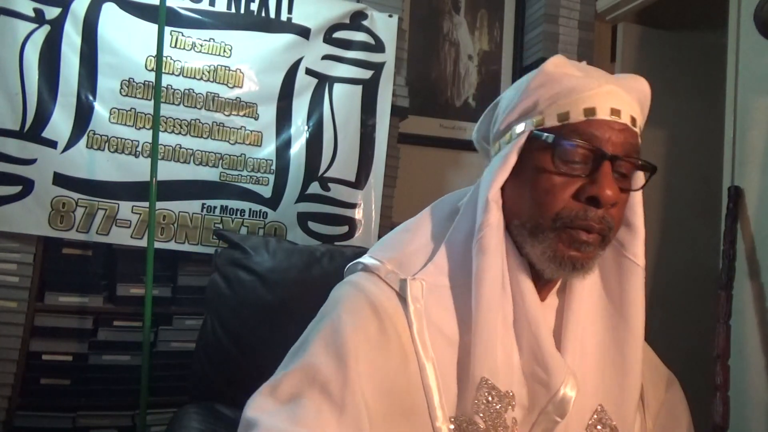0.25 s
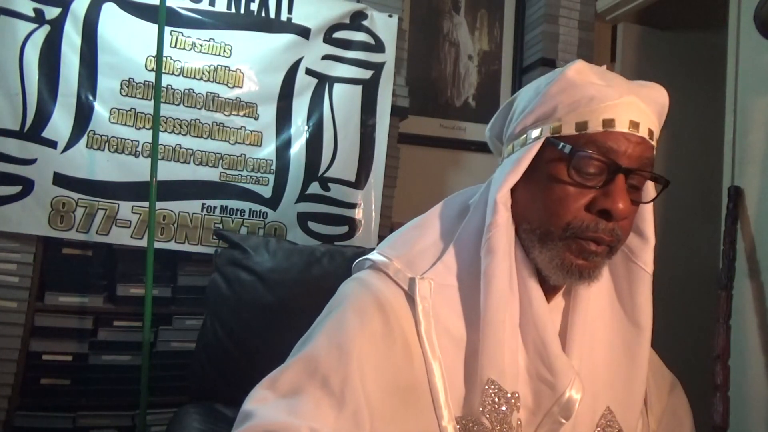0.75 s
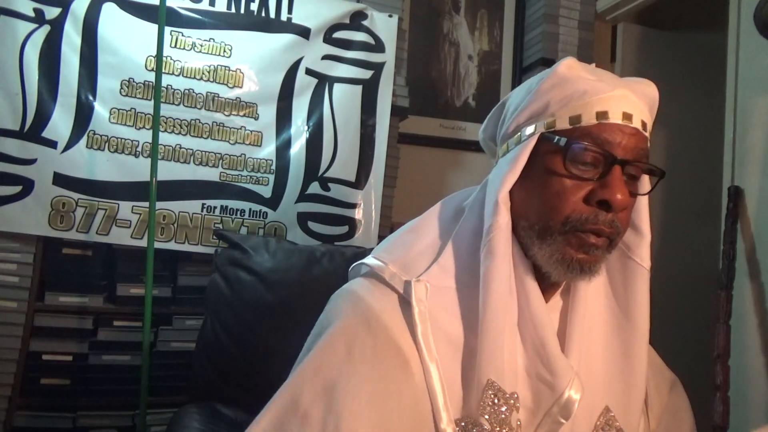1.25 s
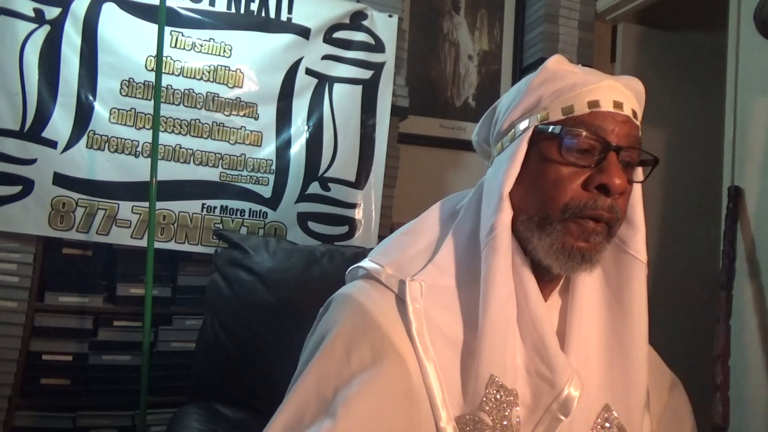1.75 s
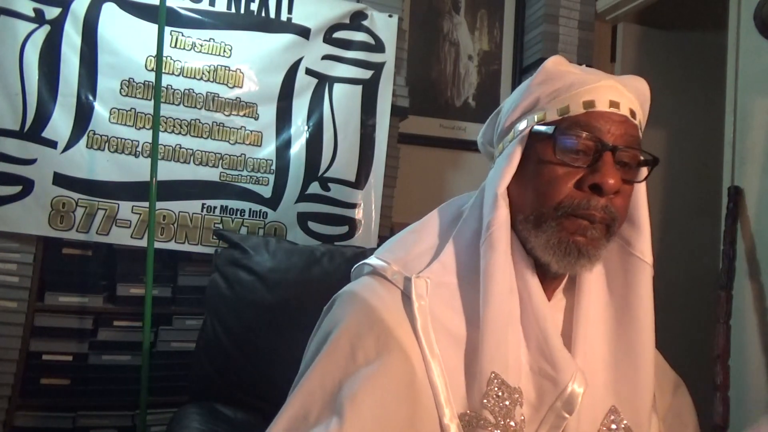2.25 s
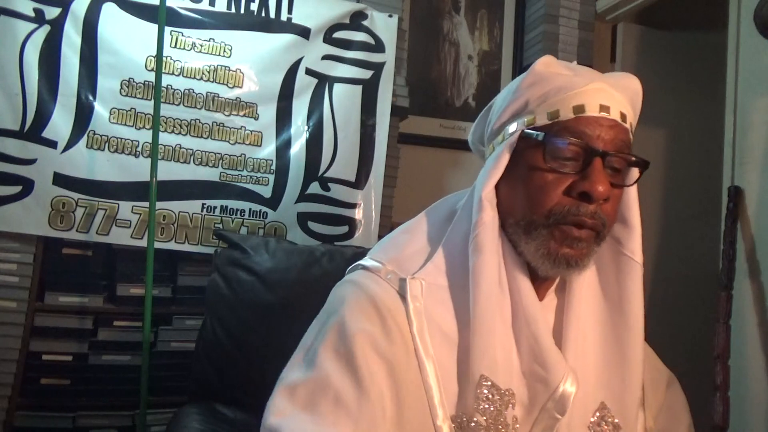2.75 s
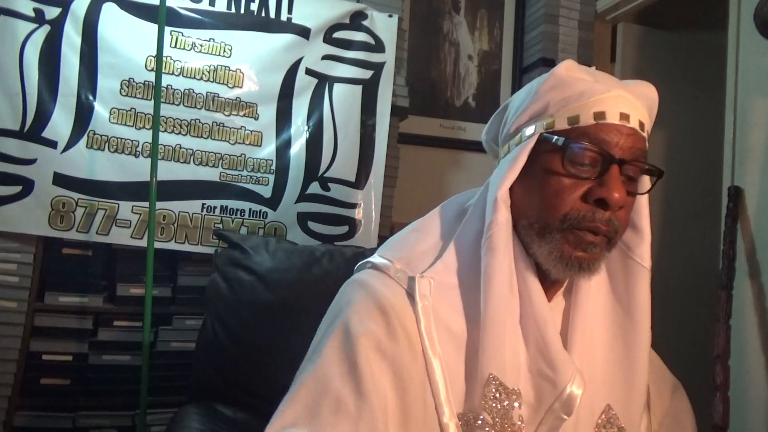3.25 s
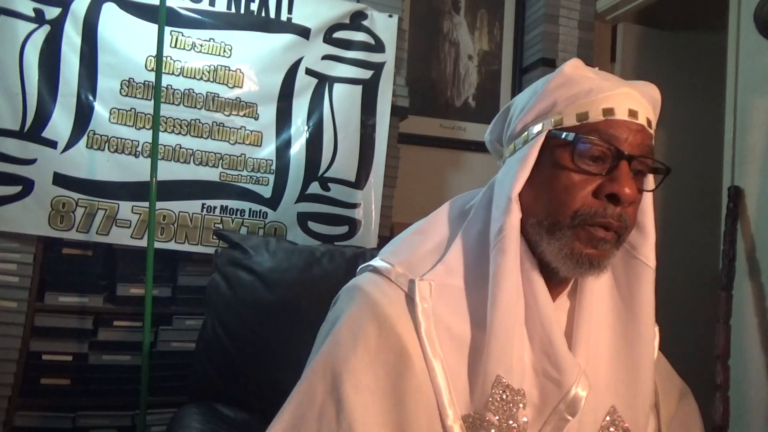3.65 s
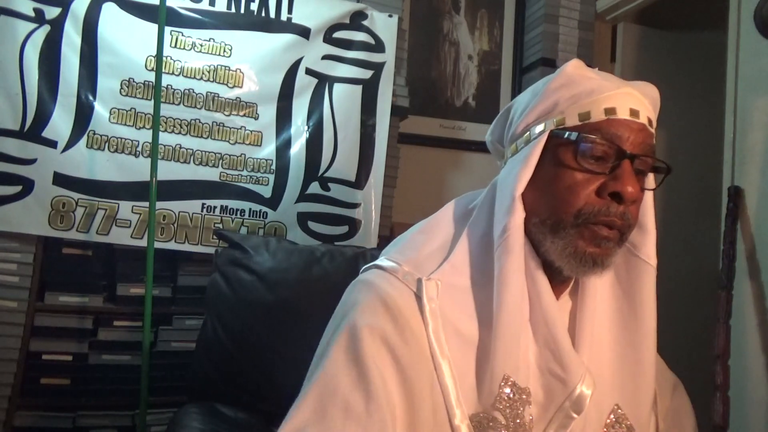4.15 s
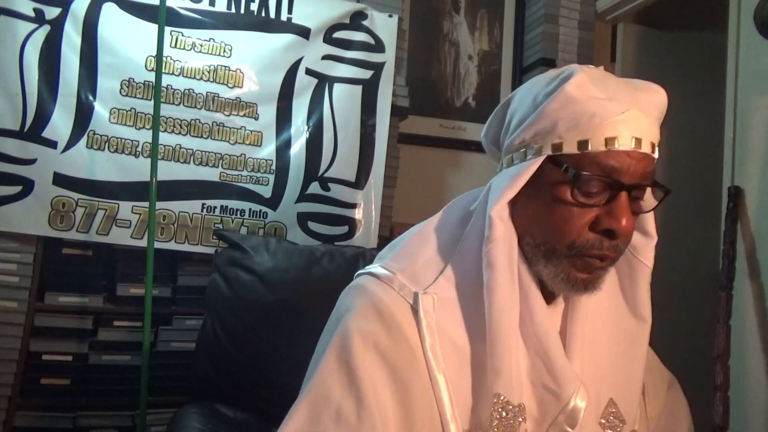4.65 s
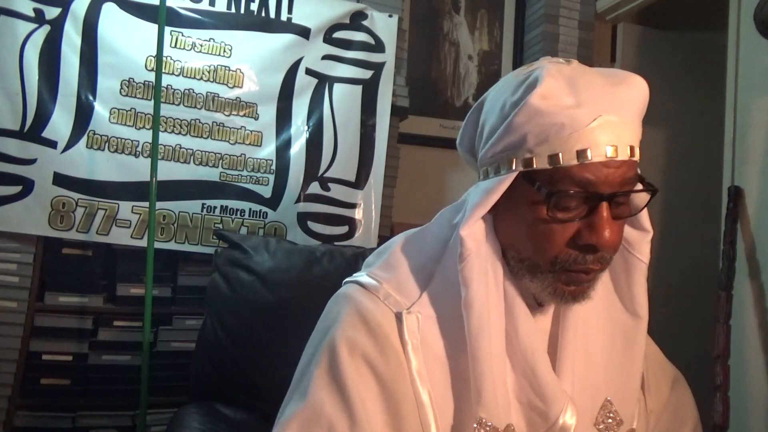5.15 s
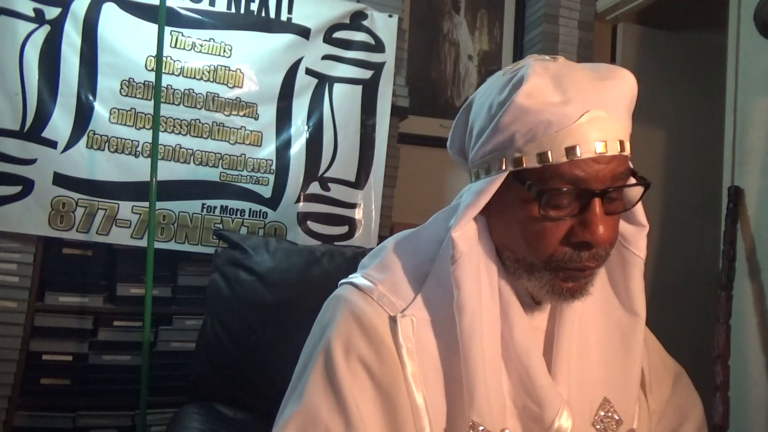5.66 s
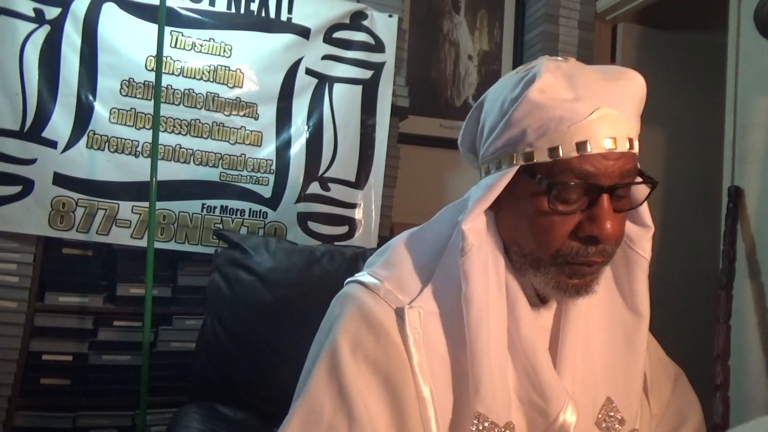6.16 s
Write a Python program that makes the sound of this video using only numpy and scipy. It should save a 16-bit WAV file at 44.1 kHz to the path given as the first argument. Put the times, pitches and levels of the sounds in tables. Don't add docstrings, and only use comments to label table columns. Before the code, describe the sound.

Close paper pages slide, crinkle and snap in irregular bursts, loudest around the middle, over a quiet room with faint fan hum and camera ticking.

```python
import sys
import numpy as np
from scipy import signal
from scipy.io import wavfile
from scipy.ndimage import uniform_filter1d

SR = 44100
rng = np.random.default_rng(int(sys.argv[2]) if len(sys.argv) > 2 else 0)


def pcm_store(signal):
    levels = np.round(np.clip(np.atleast_2d(signal), -1, 1) * 32767)
    wavfile.write(sys.argv[1], SR, levels.astype(np.int16).T)


def field_ratio(decibels):
    return 10 ** (np.asarray(decibels, dtype=float) / 20)


N = 282681


def rms_one(x):
    return x / np.sqrt(np.mean(x ** 2) + 1e-20)


def peak_one(x):
    return x / np.sqrt(uniform_filter1d(x ** 2, size=44).max() + 1e-20)


def at_hz(points, hz):
    table_hz, values = np.transpose(points)
    return np.interp(np.log(hz), np.log(table_hz), values)


def band(x, lo_hz, hi_hz):
    sos = signal.butter(2, [lo_hz, min(hi_hz, 0.45 * SR)], "band", fs=SR, output="sos")
    return signal.sosfilt(sos, x)


def resonance(x, hz, width_hz):
    r = np.exp(-np.pi * width_hz / SR)
    top = np.array([1, 0, -1]) * (1 - r * r) / 2
    return signal.lfilter(top, [1, -2 * r * np.cos(2 * np.pi * hz / SR), r * r], x)


def ring_twice(x, hz, width_hz):
    return resonance(resonance(x, hz, width_hz), hz, width_hz)


def drift(rate_hz):
    r = np.exp(-80 * np.pi * rate_hz / SR)
    chance = rng.standard_normal(N // 40 + 2002)
    slow = signal.lfilter([1], [1, -2 * r, r * r], chance)[2000:]
    return np.interp(np.arange(N) / 40, np.arange(len(slow)), rms_one(slow))


# centre in Hz, width in Hz, level in dB.
FAN_TONES = [(184, 31, -76.5), (709, 81, -76.5), (1008, 8.2, -73), (1850, 26, -86)]


def fan(white):
    return sum(field_ratio(db) * rms_one(resonance(white, hz, width_hz)) for hz, width_hz, db in FAN_TONES)


# frequency in Hz, level in dB per Hz.
HUSH_COLOUR = [(25, -7.5), (70, -7), (110, -5), (190, -7.5), (450, -13), (1000, -13), (2400, -19.5),
               (5000, -24), (10000, -29.5), (16000, -31.5)]
# frequency in Hz, left-right likeness from 0 to 1.
HUSH_LIKENESS = [(60, 0.99), (150, 0.96), (380, 0.44), (950, 0.066), (2380, 0.32), (5980, 0.8),
                 (15000, 0.99)]


def hush():
    level_db = -58.5
    edges_hz = 22 * 2 ** np.arange(0, 10, 0.5)
    white = rng.standard_normal((2, 2, N))
    air = 0
    for k, (low_hz, high_hz) in enumerate(zip(edges_hz, edges_hz[1:])):
        mid, side = band(white[k % 2], low_hz, high_hz)
        hz = np.sqrt(low_hz * high_hz)
        alike = np.clip(at_hz(HUSH_LIKENESS, hz), 0, 1)
        stereo = np.sqrt(1 + alike) * mid + np.sqrt(1 - alike) * side * [[1], [-1]]
        air = air + field_ratio(at_hz(HUSH_COLOUR, hz)) * stereo
    return field_ratio(level_db) * rms_one(air) + fan(white[0, 0])


def seat():
    hz, width_hz, level_db = 179, 68, -64
    until_s, fade_s = 0.55, 0.25
    t = np.arange(N) / SR
    rumble = rms_one(ring_twice(rng.standard_normal(N), hz, width_hz))
    return field_ratio(level_db - 20 * np.maximum(t - until_s, 0) / fade_s) * rumble


# start in seconds, hold in seconds, level in dB,
# stiffness as tilt of the body in dB, edge hiss in dB relative to the level.
PAGE_DRAGS = [(0, .02, -60, -5, -10), (.22, 0.16, -66, 1, -6.5), (1.04, 0.15, -47, -3, -9.5),
              (1.21, .14, -51.5, 1, -5.5), (1.42, .24, -54, 0.5, -4.5), (1.71, 0.12, -60, -3, -3.5),
              (1.975, 0.035, -51.5, 3, 0), (2.08, 0.11, -46.5, 8, -11), (2.32, 0.031, -45.5, 9, -6),
              (2.46, 0.14, -66.5, 6, -1), (2.7, 0.16, -53, 0, -6.5), (2.9, 0.094, -47, 0, -7.5),
              (3.12, 0.045, -45.5, 16, -10), (3.26, 0.2, -41.5, -5, -13), (3.62, 0.14, -64.5, -7, -4),
              (3.97, 0.24, -50, 2, -5), (4.2, 0.3, -50, 3, -4.5), (4.68, 0.067, -52.5, -1, -7.5),
              (4.97, 0.18, -55, -3, -8.5), (5.22, 0.21, -54.5, 3, -8.5), (5.57, 0.091, -54.5, 7, -5.5),
              (5.75, 0.31, -55, 0, -8.5), (6.15, 0.11, -55, 4, -6), (6.29, .12, -52.5, 1, -6.5)]
# peak in seconds, level in dB, stiffness in dB, edge hiss in relative dB.
HAND_TUGS = [(.18, -55.5, -3, -5), (.528, -59.5, -6, -5), (0.718, -57, 14, -6.5), (1.155, -50, -12, -20),
             (1.6, -61, 10, 7), (2.053, -47, 25, -2.5), (2.2, -45, 10, -2.5), (2.228, -51, 13, -5),
             (2.294, -42, 4, -4), (2.741, -45, -2, -3), (3.01, -49.5, 5, -7), (3.205, -33.5, 12, -8),
             (3.315, -36.5, 7, -2.5), (3.464, -29.5, 9, -8), (3.531, -41, -17, -20),
             (3.908, -36, 4.5, -2.3), (4.228, -49, 2.5, -8), (4.357, -47.5, -2, -9), (4.43, -39.5, 3, -11),
             (4.485, -49.5, 7, -11), (4.559, -48, 6, -4), (4.774, -41.5, -3, -6), (4.925, -44.5, 6, -6),
             (5.158, -47.5, -3, -14), (5.185, -52, 4, -2), (5.552, -49, 3.5, -4), (5.975, -39, 8.5, -9),
             (6.408, -45, -7, -5)]


def pulls():
    rise_db_per_s, fall_db_per_s, rest_db = 267, 225, -76
    flap_db, flap_follows = -57.5, 0.8
    flap_stiff = 0.2
    rows = PAGE_DRAGS + [(s, 0, db, stiff, skim) for s, db, stiff, skim in HAND_TUGS]
    start, hold, db, stiff, skim = np.transpose(rows)[:, :, None]
    t = np.arange(0, N + 64, 64) / SR
    rise = rise_db_per_s * np.maximum(start - t, 0)
    fall = fall_db_per_s * np.maximum(t - start - hold, 0)
    pull_db = db - rise - fall
    power, rest = field_ratio(2 * pull_db), field_ratio(2 * rest_db)
    body = power.sum(axis=0) + rest
    flap = field_ratio(2 * (flap_db + flap_follows * (pull_db + 50) - flap_stiff * stiff)).sum(axis=0)
    edge = (power * field_ratio(2 * skim)).sum(axis=0) + rest * field_ratio(-10)
    tilt_db = (power * stiff).sum(axis=0) / body
    return t, 10 * np.log10(body), 10 * np.log10(flap), 10 * np.log10(edge), tilt_db


def crackle(per_s, spread_db, clump_db):
    sizes = field_ratio(spread_db * np.minimum(rng.exponential(1, N), 5)) * rng.choice([-1, 1], N)
    born = rng.random(N) < per_s / SR
    return rms_one(sizes * born * field_ratio(clump_db * drift(26.0)))


def slide():
    s, *levels = pulls()
    felt = np.arange(N) / SR - 0.006
    body_db, flap_db, edge_db, tilt_db = (np.interp(felt, s, level) for level in levels)
    grains = crackle(5000, spread_db=2.5, clump_db=2.0)
    dealt = rng.integers(0, 12, N)
    patches = 0
    for k, hz in enumerate(np.geomspace(1050, 5700, 12)):
        rung = ring_twice(grains * (dealt == k), hz, 0.71 * hz)
        lean = np.log2(hz / 2500) / 4.0
        patches = patches + rms_one(rung) * field_ratio((tilt_db - 1.5) * lean + 1.7 * drift(8.5))
    flap = rms_one(band(grains + 0.7 * rng.standard_normal(N), 222, 1026))
    waft = rms_one(band(rng.standard_normal(N), 22, 165))
    edge = band(band(grains, 5850, 10700), 3600, 11600) + field_ratio(-12.5) * band(grains, 9650, 18300)
    body_part = field_ratio(body_db + 0.5) * rms_one(patches)
    flap_part = field_ratio(flap_db + 0.2) * (flap + field_ratio(-16.5) * waft)
    edge_part = field_ratio(edge_db - 2.0 + 0.73 * drift(35)) * rms_one(edge)
    return body_part + flap_part + edge_part


def camera():
    start_hz, end_hz, glide_s = 2200, 3235, 0.0013
    tick_db, decay_s = -53, 0.0062
    frame_hz, first_tick_s = 29.97, 0.0288
    pause_s, resume_s = 1.15, 3.3
    whine_hz, whine_db = 7867, -83
    t = np.arange(1200) / SR
    pitch_hz = end_hz + (start_hz - end_hz) * np.exp(-t / glide_s)
    phase = 2 * np.pi * np.cumsum(pitch_hz) / SR
    chirp = np.sin(phase) * (1 - np.exp(-t / 0.0005)) * np.exp(-t / decay_s)
    starts = np.arange(first_tick_s, N / SR - 0.01, 1 / frame_hz)
    running = (starts < pause_s) | (starts > resume_s)
    kicks = np.zeros(N)
    kicks[(starts * SR).astype(int)] = running * field_ratio(tick_db + 1.1 * rng.standard_normal(len(starts)))
    whine = field_ratio(whine_db) * np.sin(2 * np.pi * whine_hz * np.arange(N) / SR)
    return signal.fftconvolve(kicks, chirp)[:N] + whine


# time in seconds, level in dB over 1 ms, ring in Hz.
CRACKS = [(1.6772, -41.5, 3800), (1.9338, -46, 2810), (2.0384, -37, 5740), (2.048, -34, 6400),
          (2.1121, -53, 4000), (2.1231, -36.5, 4100), (2.197, -39, 7000), (2.3183, -35.5, 6200),
          (2.6459, -46, 1680), (2.728, -31.5, 8160), (2.7327, -37, 7900), (3.2121, -33, 2970),
          (3.2502, -30, 1510), (3.3091, -20, 3260), (3.317, -30, 4220), (3.406, -34, 2650),
          (3.4618, -16.5, 3740), (3.8884, -26.5, 6760), (3.906, -26.5, 2200), (4.1661, -35.5, 3530),
          (4.548, -37, 1670), (4.7329, -41.5, 3780), (4.7681, -28.5, 4500), (5.2451, -42, 2960),
          (5.2842, -45, 1960), (5.3177, -45, 2880), (5.387, -43, 4550), (5.6342, -42, 2440),
          (5.912, -40, 6500), (6.0425, -52, 8000)]
FLICKS = [(.98, -45.5, 2940), (1.0299, -38, 2490), (2.062, -35, 3830), (2.277, -40, 12500),
          (2.289, -32.5, 3300), (2.937, -42.5, 3000), (3.0193, -37.5, 3770), (3.1157, -36, 2870),
          (3.167, -26.5, 4530), (3.1948, -21, 5140), (3.2017, -26.5, 4160), (3.2265, -27, 2640),
          (3.2595, -46, 3800), (3.3248, -27.5, 3860), (3.3563, -31, 2110), (3.4585, -27, 1700),
          (3.486, -25.5, 3700), (4.0078, -32, 3750), (4.0983, -43, 2340), (4.3525, -24, 1850),
          (4.3911, -31, 2420), (4.4355, -31.5, 4090), (4.7642, -30.5, 4000), (4.8243, -35, 4080),
          (4.9156, -27.5, 2420), (5.0707, -45.5, 2980), (5.3453, -41, 3120), (5.848, -37.5, 2700),
          (5.9288, -32, 2930), (5.9614, -23, 3550)]
POPS = [(.4841, -53, 1430), (1.079, -29, 1850), (1.1535, -39, 1470), (1.408, -41, 2820),
        (1.654, -38.5, 3340), (2.3778, -36.5, 2970), (2.8025, -38.5, 2420), (3.1314, -31.5, 3800),
        (3.158, -21, 4200), (3.451, -22, 3170), (3.4649, -22, 1430), (3.5142, -44, 1680),
        (3.5372, -42, 1900), (3.5532, -31, 2330), (3.5771, -42, 2800), (4.047, -35, 2870), (4.2, -43, 1900),
        (4.2366, -37.5, 1720), (4.6228, -38.5, 3550), (4.7115, -33.5, 3650), (4.776, -29, 4200),
        (4.8935, -38.5, 1490), (4.924, -34, 2020), (5.001, -36.5, 2600), (5.155, -38.5, 1490),
        (5.6511, -35.5, 1670), (5.6923, -43.5, 2300), (5.7648, -36, 2740), (6.0547, -36.5, 2440),
        (6.1506, -43.5, 2620)]
FOLDS = [(1.0869, -39, 1510), (1.1434, -37, 1220), (1.1676, -40, 1560), (1.2308, -44, 1770),
         (1.4204, -33.5, 2040), (1.428, -49, 1530), (1.5861, -43.5, 1360), (2.298, -37.5, 2170),
         (2.6926, -45, 1510), (2.7705, -42, 1600), (3.0051, -37.5, 1960), (3.297, -32, 2590),
         (3.4161, -32, 3430), (3.4681, -26.5, 3210), (3.4787, -26.5, 3080), (3.9208, -39, 1700),
         (3.9522, -44, 2100), (4.1742, -43.5, 1990), (4.381, -40, 1310), (4.4132, -32, 2540),
         (4.4243, -34.5, 1750), (4.5735, -44.5, 2340), (5.021, -46.5, 3200), (5.4112, -53, 1540),
         (5.725, -49.5, 2020), (5.9695, -29.5, 3660), (5.9797, -31, 1800), (6.012, -36.5, 4770),
         (6.3014, -42, 3320), (6.327, -45, 2500)]


def snaps():
    # low push and top crack, in dB relative to the ring
    kinds = ((CRACKS, (-12.5, -2.4)), (FLICKS, (-17, -6)), (POPS, (-19.5, -48)), (FOLDS, (-6, -7)))
    push_db_per_octave = -5
    creases = [row + colour for rows, colour in kinds for row in rows]
    t = np.arange(900) / SR
    chance = rng.standard_normal((len(creases), len(t)))
    rattle = chance * (np.exp(-t / 0.00024) + field_ratio(-16.5) * np.exp(-t / 0.003))
    rattle[:, 0] = 2.75 * np.sign(rattle[:, 0])
    cracks = band(band(rattle, 7100, 9100), 4100, 20700) + field_ratio(-19) * band(rattle, 12600, 22000)
    pushes = band(chance * np.exp(-t / 0.0034), 160, 1660)
    out = np.zeros(N + len(t))
    for (s, ring_db, hz, low_db, top_db), kick, crack, push in zip(creases, rattle, cracks, pushes):
        sheet = field_ratio(-10.5) * band(band(kick, 1650, 4000), 1800, 13000)
        ring = ring_twice(kick, hz, 0.44 * hz + 300) + sheet
        push_db = low_db + 4.5 + push_db_per_octave * np.log2(hz / 2200)
        snap = peak_one(ring) + field_ratio(push_db) * peak_one(push) + field_ratio(top_db - 1) * peak_one(crack)
        first = round(s * SR)
        out[first:first + len(t)] += field_ratio(ring_db + 2.5) * snap
    return out[:N]


# time in seconds, peak in dB, pitch in Hz, length in seconds.
BLOCK_THUDS = [(1.425, -43, 218, 0.01), (1.43, -49.5, 122, 0.036), (.637, -53, 290, .012),
               (1.7, -43.5, 437, .008), (1.776, -44, 130, 0.051), (1.816, -54.5, 75, 0.056),
               (2.3, -54, 100, 0.016), (3.46, -30, 113, 0.013), (3.788, -59, 32, .09),
               (4.43, -51, 120, 0.026), (5.969, -60, 125, 0.052)]


def thuds():
    rumble_share = 0.56
    t = np.arange(N) / SR
    white = rng.standard_normal(N)
    out = np.zeros(N)
    for s, db, hz, length_s in BLOCK_THUDS:
        cycles = np.sin(2 * np.pi * hz * (t - s))
        rumble = rms_one(band(white, 0.8 * hz, 1.86 * hz))
        swell = np.exp(-((t - s) / (length_s / 2)) ** 2)
        out += field_ratio(db) * (cycles + rumble_share * rumble) * swell
    return out


def room(x):
    t60_s, wall_cut_hz = 0.074, 11500
    t = np.arange(SR // 3) / SR
    noise = band(rng.standard_normal((2, len(t))), 410, wall_cut_hz)
    tail = noise * field_ratio(-60 * t / t60_s) * (t > 0.002)
    tail /= np.sqrt(np.sum(tail ** 2, axis=1, keepdims=True))
    return signal.fftconvolve(x[None], tail, axes=1)[:, :N]


def scene():
    book = slide() + snaps() + thuds()
    lift = field_ratio(3.7)
    lean = (lift - 1) / (lift + 1) * resonance(book, 410, 5400)
    placed = book + lean * [[-1], [1]]
    return placed + field_ratio(-14) * room(book) + hush() + camera() + seat()


def band_limit(x):
    return signal.sosfilt(signal.butter(12, 16520, fs=SR, output="sos"), x)


def record(dry):
    low_pass = signal.cheby2(12, 50, 16250, fs=SR, output="sos")
    mix = signal.sosfilt(low_pass, dry)
    return band_limit(mix)


dry = scene()
out = record(dry)
pcm_store(out)
```